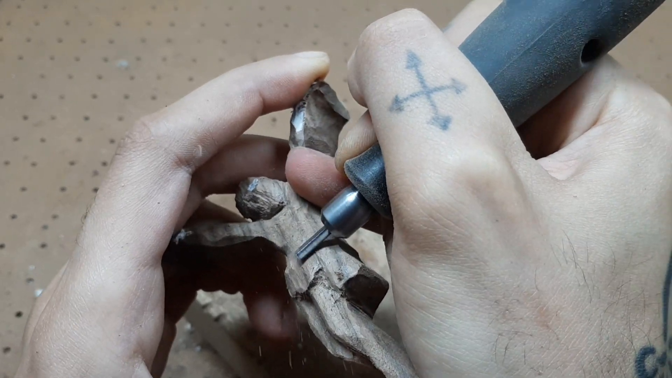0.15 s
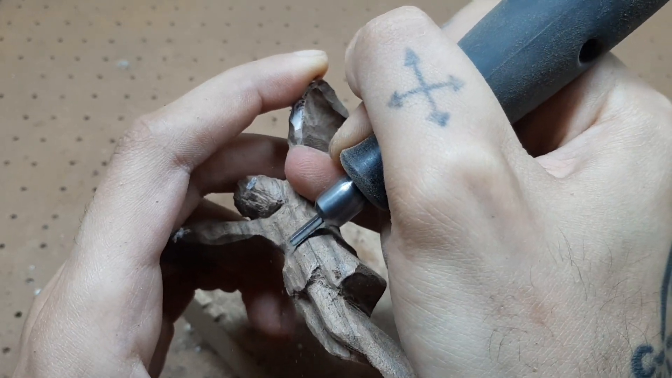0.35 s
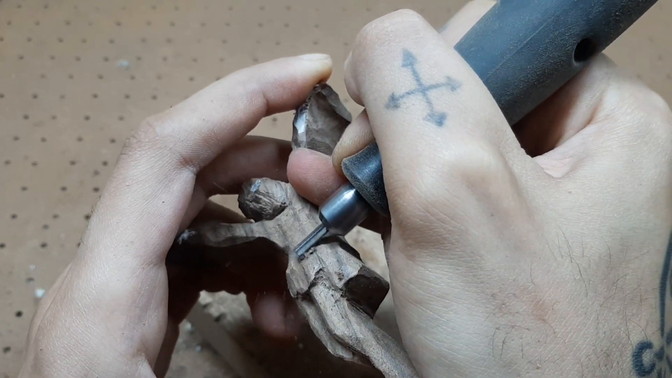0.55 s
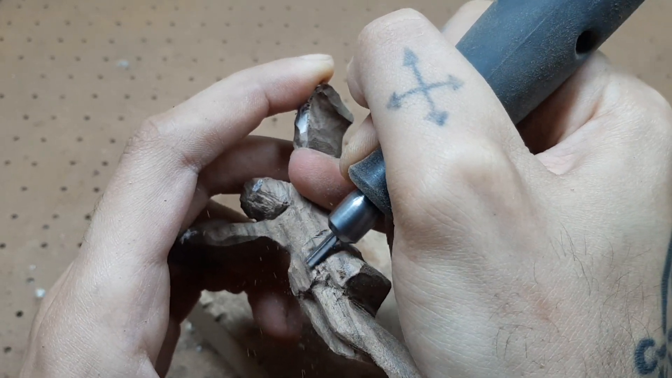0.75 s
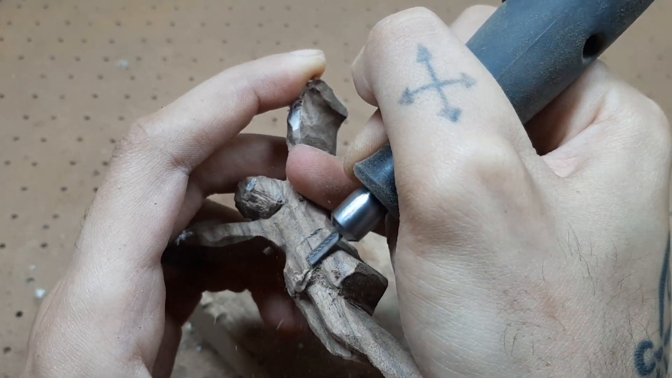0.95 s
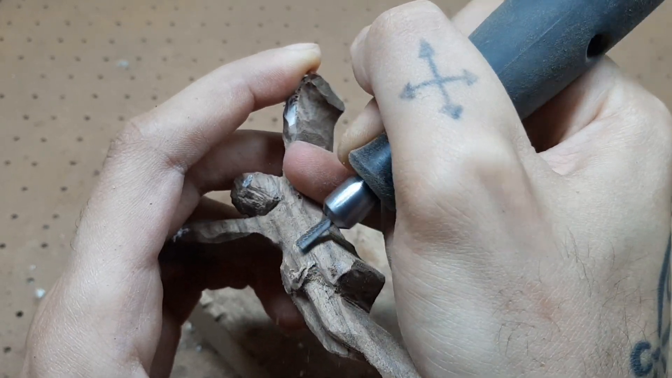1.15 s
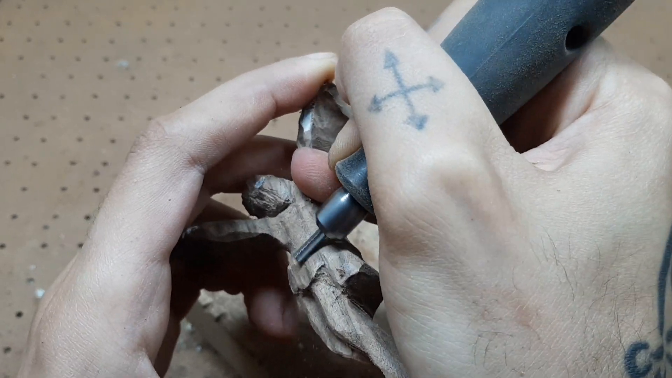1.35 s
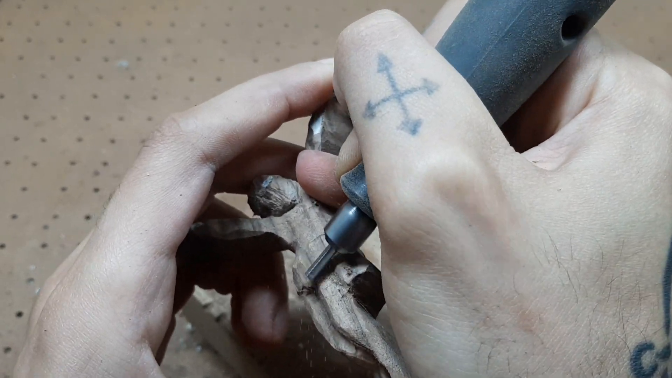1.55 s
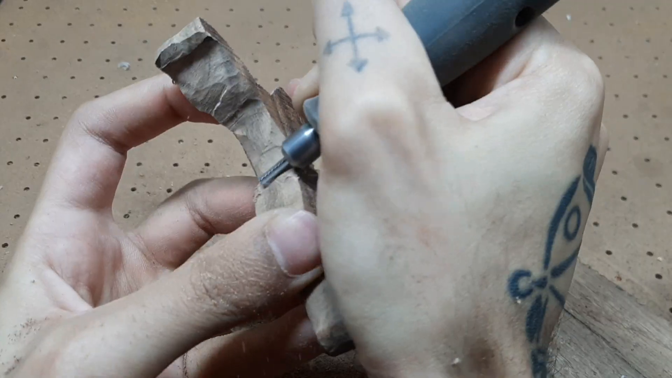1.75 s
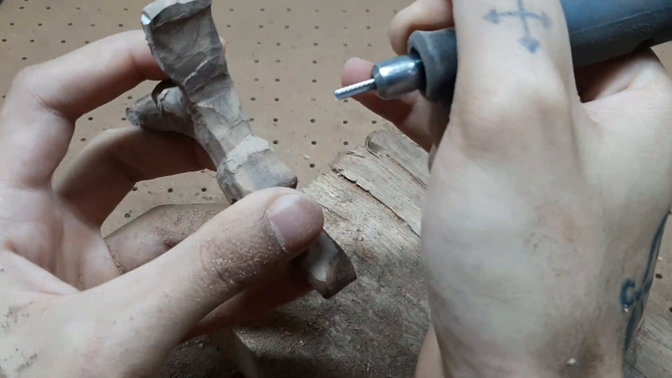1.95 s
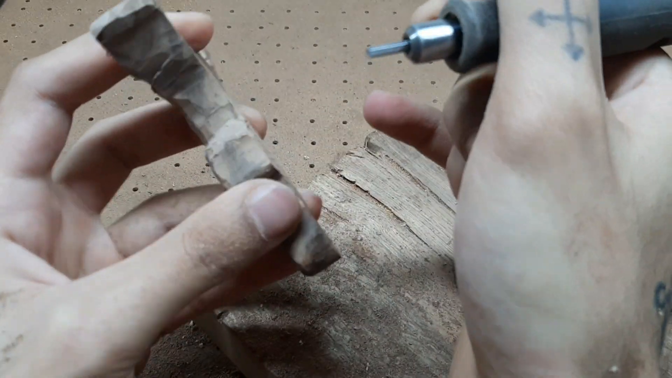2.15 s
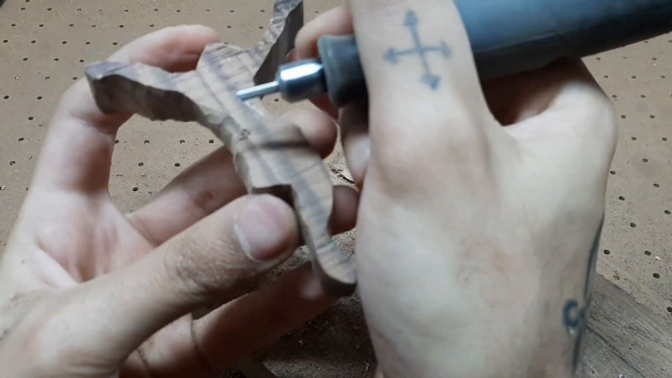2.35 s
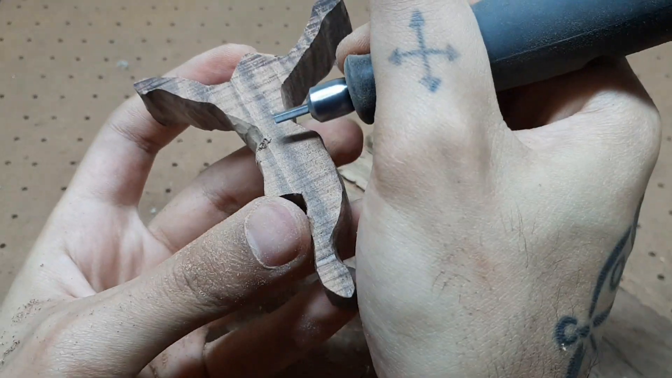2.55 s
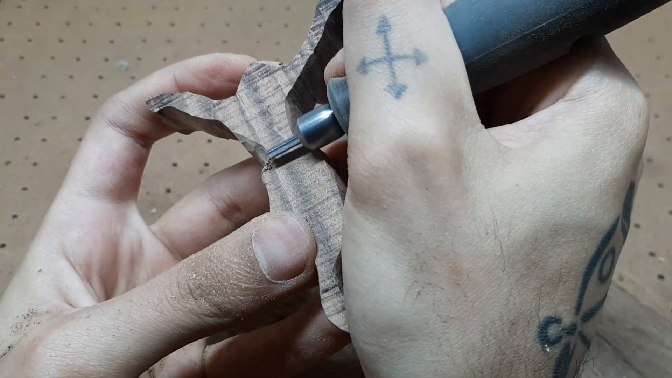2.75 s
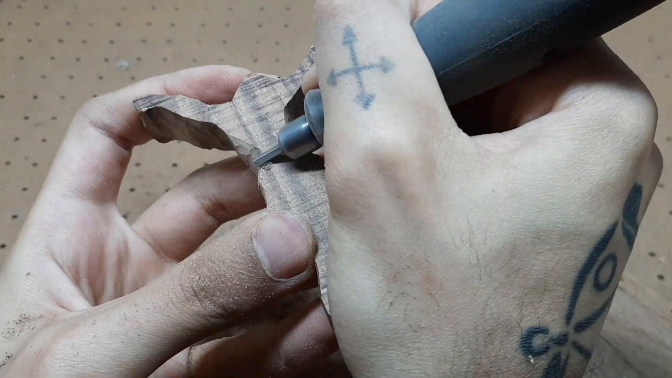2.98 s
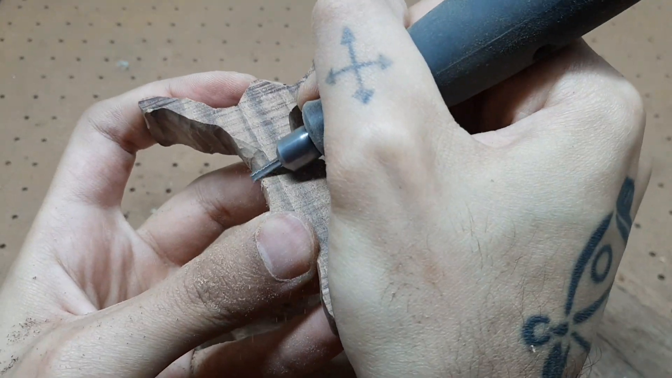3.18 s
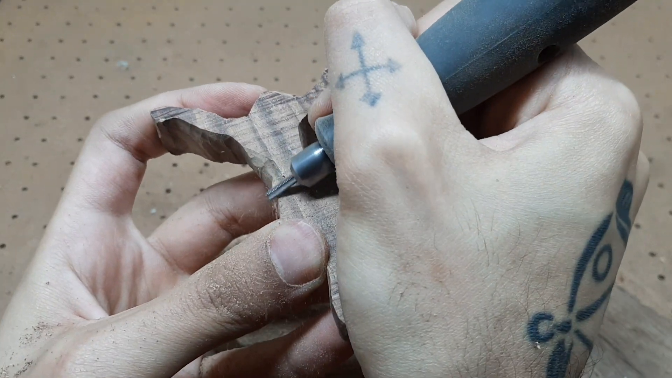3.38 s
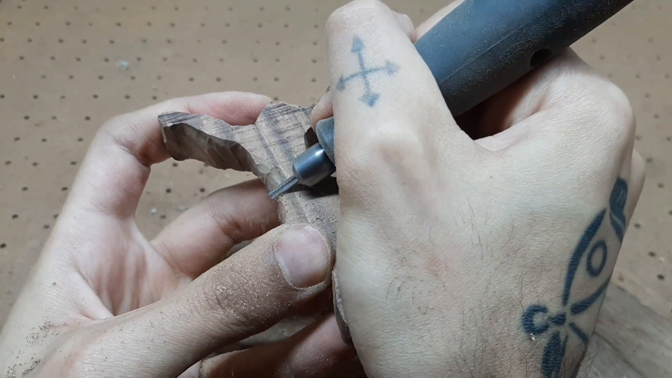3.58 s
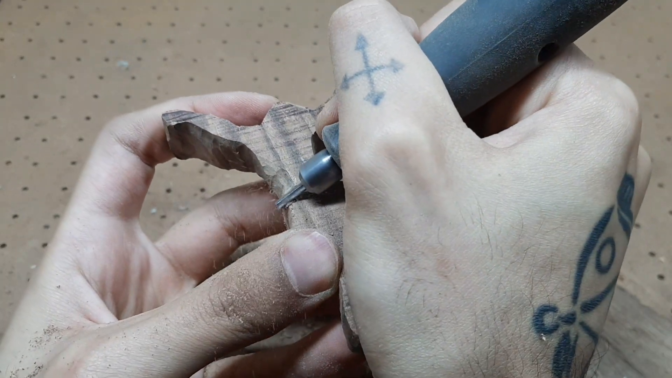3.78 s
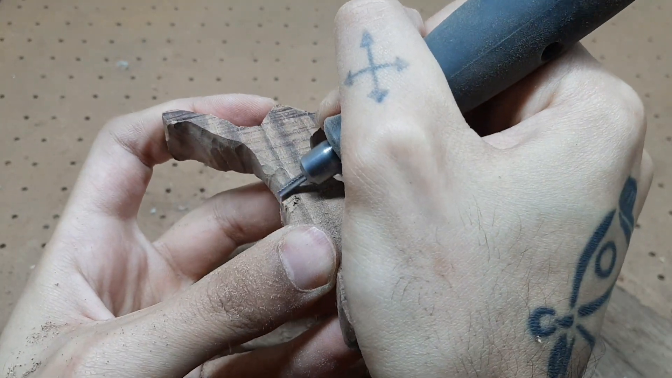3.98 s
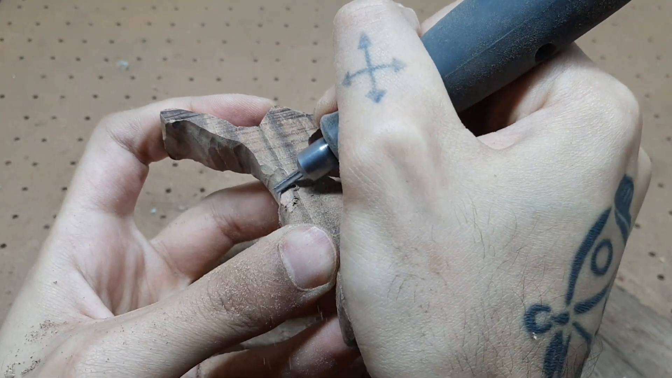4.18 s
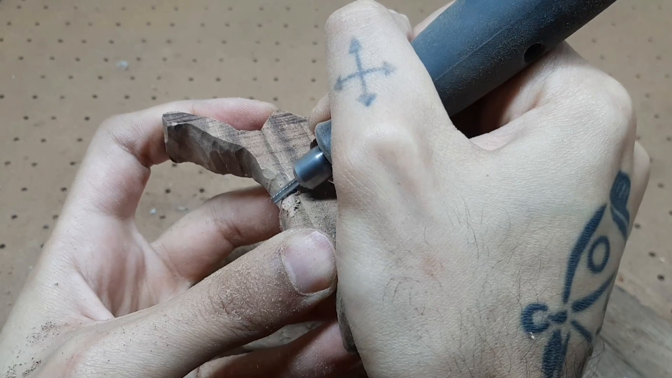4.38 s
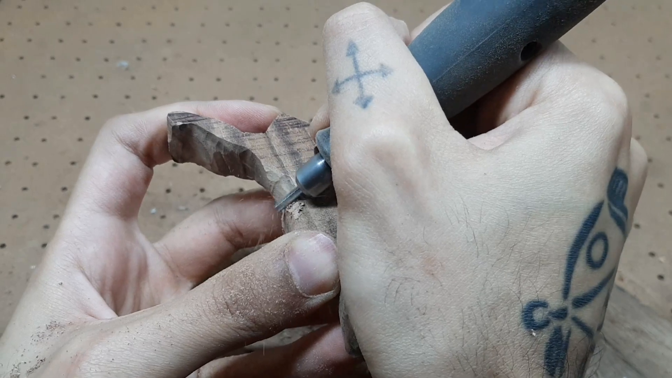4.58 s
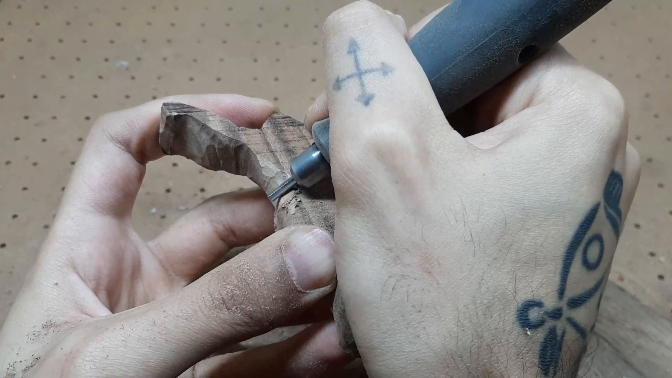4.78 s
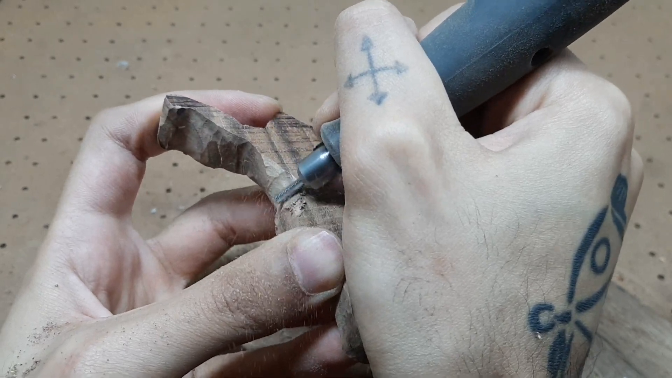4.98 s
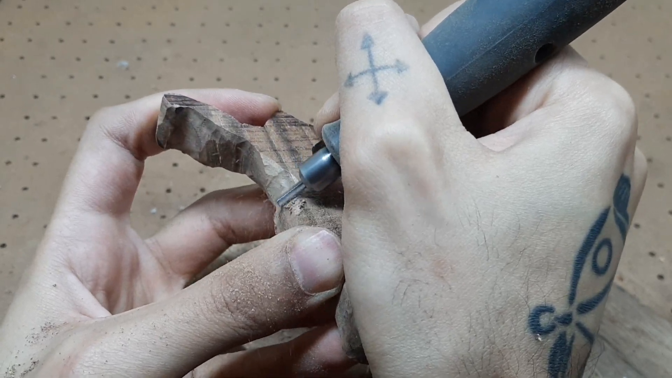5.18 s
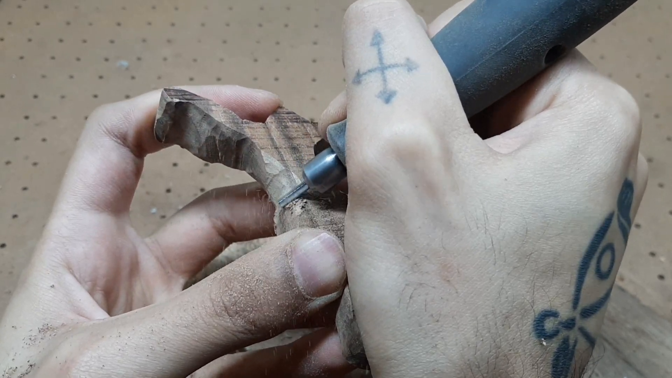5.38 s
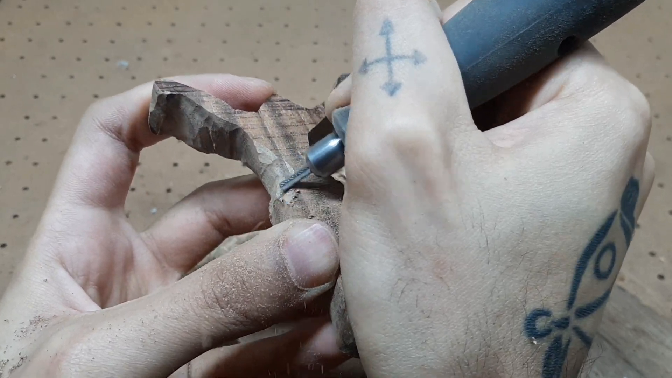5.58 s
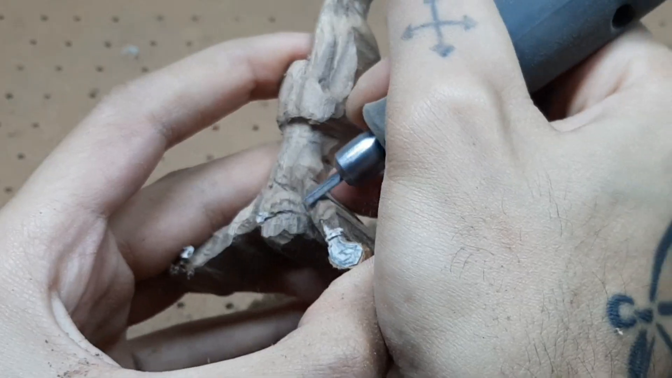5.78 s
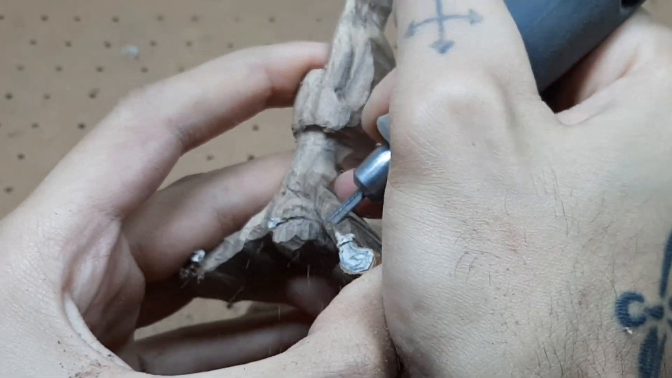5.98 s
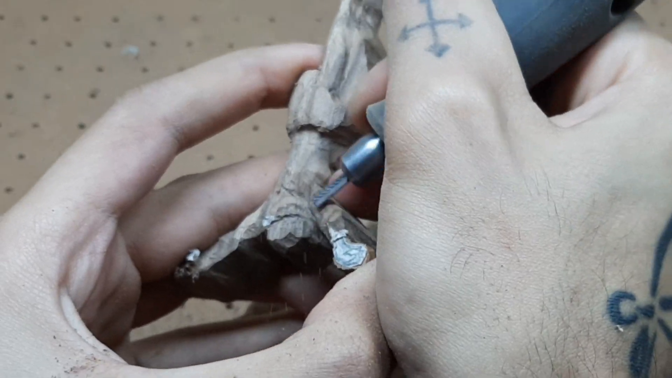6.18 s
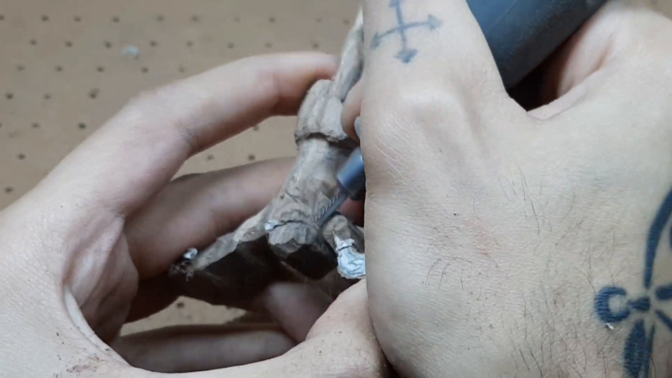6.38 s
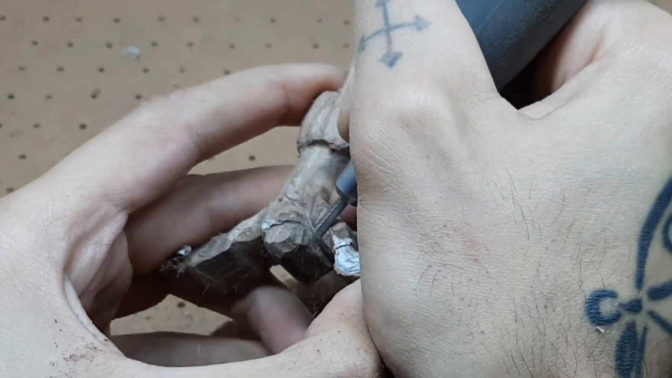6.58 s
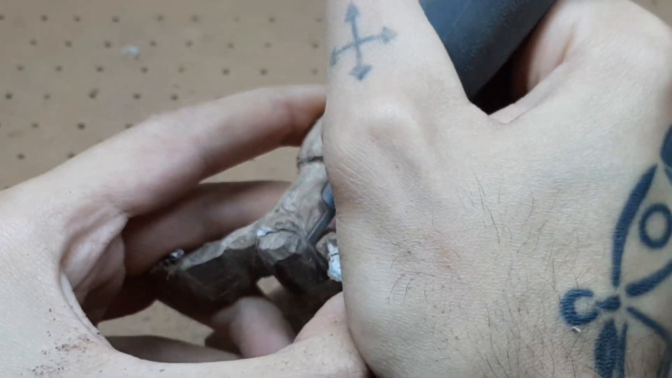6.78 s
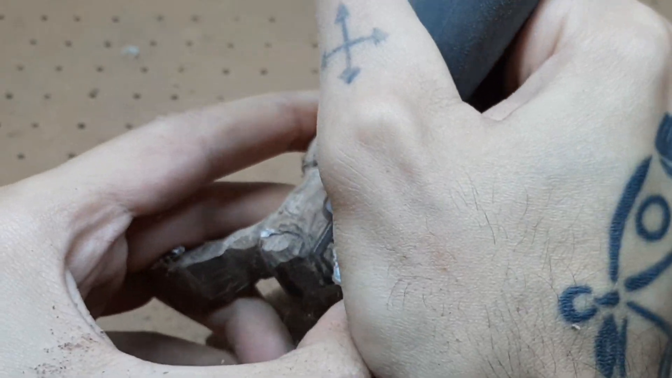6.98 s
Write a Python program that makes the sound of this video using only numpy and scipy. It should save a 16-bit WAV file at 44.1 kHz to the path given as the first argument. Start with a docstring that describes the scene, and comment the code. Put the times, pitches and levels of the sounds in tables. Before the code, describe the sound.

Close-up wood carving with a high-pitched rotary tool: steady airy whir, quick gritty strokes, a short pause with soft thuds, then harsher buzzing bites.

```python
"""A small rotary tool carves a hardwood figure held in the hand, close to a stereo microphone in a workshop.
Its motor rushes and whines through the housing all along, as filtered noise and narrow shaken tones.
Quick strokes open: noise and chip impulses shaped by resonances of wood and bit, with chatter in hard cuts.
In a pause near 2 s the hands knock softly on the bench, as noise bursts that excite decaying modes.
The wood rings differently in a second grip from 2.3 s, where snags bite hard, and in a third from 5.75 s."""
import sys
import numpy as np
from scipy import signal
from scipy.fft import rfft, irfft, next_fast_len
from scipy.io import wavfile

SR = 44100
rng = np.random.default_rng(int(sys.argv[2]) if len(sys.argv) > 2 else 0)


def unload_audio(sound):
    """Save the sound as a 16-bit wav file, at the path given as the first command line argument."""
    columns = np.transpose(np.atleast_2d(sound))
    # keep every value between -1 and 1, then stretch to whole-number steps
    steps = np.round(np.clip(columns, -1, 1) * 32767)
    wavfile.write(sys.argv[1], SR, steps.astype(np.int16))


N = 310464
TIME = np.arange(N) / SR  # s

# strokes of the cutter: middle t/s, half length/s, relative level/dB, rasp of the bit over body of the wood/dB
STROKES = [(.056, .03, -34, 0.5), (0.136, 0.041, -37, -8), (0.223, 0.039, -33.5, -1),
           (0.408, .035, -39.5, -8), (0.509, 0.031, -31, -1.5), (0.627, 0.062, -31.5, -1),
           (0.801, 0.076, -31, -5), (1.009, 0.081, -30.5, -6.5), (1.144, .048, -29.5, -5),
           (1.335, 0.046, -32.5, -5.5), (1.478, 0.053, -30, -3), (1.627, 0.051, -30.5, -5),
           (1.736, 0.043, -40, 7), (1.855, .012, -31.5, 3), (2.634, .14, -38, 24), (2.884, .07, -38, -1),
           (2.978, .035, -29.5, -1), (3.09, 0.045, -26, 9), (3.311, 0.06, -35, 1.5), (3.464, .03, -30, 4.5),
           (3.535, 0.031, -38.5, -6), (3.646, 0.067, -33, 3), (3.735, .04, -23.5, 2.5),
           (3.856, .085, -28, 3), (3.975, .045, -36.5, -1), (4.201, 0.063, -36, 3), (4.335, .05, -33, 3),
           (4.525, 0.069, -33, 1), (4.695, 0.066, -25.5, 1.5), (4.912, 0.054, -33, 0.5),
           (5.056, 0.049, -30.5, 1), (5.252, 0.052, -33.5, -1.5), (5.45, 0.073, -28.5, 2.5),
           (5.555, 0.057, -31, 2), (5.677, 0.024, -37, 1), (5.907, 0.047, -32.5, -3.5),
           (6.038, .048, -28.5, -2), (6.188, 0.046, -31, -2.5), (6.328, .04, -29, -1),
           (6.472, 0.046, -31, -2), (6.609, 0.046, -30, -1.5), (6.74, 0.052, -29.5, -2),
           (6.892, 0.042, -31, -3.5), (7.021, .028, -26, 0.5)]
# likeness of the two sides: f/Hz, coherence of the motor, coherence of the wood
LIKENESS = [(100.1, 0.73, 1), (400.7, 0.46, 0.91), (1310, 0.66, 0.65), (3150, 0.046, 0.1833),
            (5230, 0.52, 0.63), (7300, 0.0779, 0.083), (15000, 0.056, 0.18)]
# grinding spectrum in each grip: f/Hz, relative level/dB per Hz
GRIND_FRONT = [(80, -35), (280, -38), (550, -32), (1200, -23), (2200, -16), (3100, -12), (5000, -8),
               (6200, -13), (7200, -21), (10000, -20), (15200, -29)]
GRIND_BACK = [(80, -33), (280, -33), (550, -32.5), (1200, -14.5), (2200, -16.5), (3100, -16.5),
              (5000, -13.5), (6200, -19.5), (7200, -20.5), (10000, -25.5), (15200, -26)]
GRIND_END = [(80, -30.5), (280, -37), (550, -26.5), (1200, -19.5), (2200, -22), (3100, -15), (5000, -11),
             (6200, -9), (7200, -18), (10000, -20.5), (15200, -23.5)]
# resonances of wood and bit in each grip: f/Hz, width/Hz, lift/dB
WOOD_FRONT = [(852, 240, 14.5), (1587, 280, 16), (2046, 450, 15), (3690, 42, 7.5), (4033.6, 170.2, -1),
              (5480, 180, 7.5)]
WOOD_BACK = [(666, 230, 17.3), (1482, 340, 11.4), (1877, 730, 15.6), (2740, 110, 8.2), (4380, 396, 9.5),
             (5890, 720, 15.1)]
WOOD_END = [(650, 134, 5.5), (1020, 32, 4), (1571, 350, 15.8), (1985.6, 440, 14.2), (3600, 500, 4.8),
            (4200, 63, 2.1)]

FIRM_DB = -30  # level of an ordinary firm cut
RASP_HZ = 2800  # the body of the wood sounds below, the rasp of the bit above


def carving():
    """Stick-slip grows with force: heavier strokes chatter more, and a snag chatters most."""
    # snags, where the bit catches in the grain for an instant: t/s, half length/s, relative level/dB
    snag_list = [(.37, .012, -29.8), (.516, 0.015, -30.5), (.641, .014, -28.5), (.777, 0.019, -31.5),
                 (1.397, .012, -33), (2.957, 0.0089, -30), (3.097, 0.015, -21.5), (3.133, 0.0081, -22),
                 (3.29, .012, -26), (3.693, .009, -21), (3.766, .009, -25), (3.833, 0.013, -24),
                 (3.88, .008, -26.5), (3.947, .007, -23), (4.208, .008, -28), (4.338, 0.0099, -30),
                 (4.716, 0.014, -18.5), (5.035, .011, -25), (5.062, .008, -25.5), (5.261, .008, -30.5),
                 (5.427, .011, -19.5), (5.512, 0.011, -22.5), (5.539, .011, -19), (5.92, .013, -32),
                 (6.331, 0.0073, -26.5)]
    chatter_db, chatter_span_db = -26, 3.5  # level where skipping sets in, and how gradually
    cuts = []
    for s, half_s, level_db, rasp_db in STROKES:
        skipping = 1 / (1.5 + np.exp((chatter_db - level_db) / chatter_span_db))
        cuts.append((s, half_s, level_db, rasp_db, skipping))
    for s, half_s, level_db in snag_list:
        snag_rasp_db = grip_at(s)[3]
        cuts.append((s, half_s, level_db, snag_rasp_db, 1))
    out = np.zeros((2, N))
    for s, half_s, level_db, rasp_db, skipping in cuts:
        sound = cut(half_s, level_db, rasp_db, skipping, grip_at(s))
        add(out, sound, s - sound.shape[1] / SR / 2)
    return out


def grip_at(s):
    """Boundary conditions set the modes of a body: find the grip that holds the piece at time s."""
    # from t/s, free main ring f/Hz, ring under a firm cut f/Hz, rasp of a snag/dB, grinding spectrum, resonances
    grip_list = [(0, 1634, 1590, -5, GRIND_FRONT, WOOD_FRONT), (2.3, 1483, 1560, 2, GRIND_BACK, WOOD_BACK),
                 (5.75, 1622, 1640, 0, GRIND_END, WOOD_END)]
    return grip_list[sum(s > later[0] for later in grip_list[1:])]


def cut(half_s, level_db, rasp_db, skipping, grip, bend_s=0.000803):
    """Forced vibration: the force of bite and chips drives wood that rings low and a bit that rasps high."""
    # where the wood sits: f/Hz, left minus right level/dB
    wood_sides = [(100, 1.5), (750, 3), (1500, 5.5), (2050, -0.5), (2900, -2.5), (4250, 3), (5700, -6.5),
                  (7200, 4), (8500, 18), (10800, 7.5), (15000, 4)]
    ring_scatter = .012  # each spot on the piece rings a little differently
    ring_sag_hz_per_db = 3.5  # pressing harder loads the wood and lowers its ring
    chatter_per_swing = .488  # skips of the bit for each swing of the wood
    lock_db, lock_width_hz = 3.5, 87  # wood and bit fall into step and sharpen the ring
    uneven_db, uneven_hz = 0.62, 39.8  # the grain makes the pressure waver
    chatter_share = 0.64  # of the power of the force in a snag

    _, free_hz, firm_hz, _, grind, modes = grip
    ring_hz = firm_hz * (1 + ring_scatter * rng.standard_normal())
    ring_hz = ring_hz - ring_sag_hz_per_db * (level_db - FIRM_DB)
    skip_hz = ring_hz * chatter_per_swing

    size = next_fast_len(int(6 * half_s * SR) + 2048)
    f = np.fft.rfftfreq(size, 1 / SR)
    gain = colour(f, grind, modes, ring_hz / free_hz)  # the fingers load the wood and move its ring
    # the lift stands on the second harmonic of the skips
    gain = gain * undb(lock_db / (1 + (2 * (f - 2 * skip_hz) / lock_width_hz) ** 2))

    # body and rasp are balanced by power
    low = 1 / (1 + (f / RASP_HZ) ** 12)
    body = gain ** 2 * low
    rasp = gain ** 2 * (1 - low)
    power = body / body.mean() + rasp / rasp.mean() * undb(rasp_db) ** 2
    gain = np.sqrt(power / power.mean()) * undb(level_db)
    # bending waves carry the treble faster than the bass, which smears each blow; bend_s is the delay at RASP_HZ
    gain = gain * np.exp(-4j * np.pi * bend_s * np.sqrt(f * RASP_HZ))

    # brief bites grab and release abruptly, long touches swell
    t = (np.arange(size) - size / 2) / SR
    edge = np.interp(half_s, [.012, .04], [3, 2.1])
    pressure = np.exp(-np.abs(t / half_s) ** edge)
    waver = walk(uneven_hz, size)
    pressure = pressure * undb(uneven_db * (waver - waver.mean()))

    share = chatter_share * skipping
    chips = grit(size, flutter_hz=199.9, flutter_db=1.3, chip_rate=900, chip_share=0.19)
    force = np.sqrt(1 - share) * chips
    force[0] += np.sqrt(share) * chatter(pressure, skip_hz)
    return radiate(force * pressure, gain, wood_sides, [(hz, c) for hz, _, c in LIKENESS])


def chatter(pressure, hz, sag=.09):
    """Stick-slip: the bit skips in uneven blows of power 1, whose rate sags as the cut digs in."""
    size = len(pressure)
    dug = np.cumsum(pressure ** 2) / np.sum(pressure ** 2)  # from 0 to 1 through the cut
    unsteady = .036 * walk(70, size) + .034 * walk(700, size)
    strength = undb(1.8 * walk(400, size))
    skips = np.cumsum(hz * (1 - sag * (dug - .5) + unsteady)) / SR
    blows = np.diff(np.floor(skips), prepend=0) * strength  # one blow at each whole skip
    return (blows - blows.mean()) / blows.std()


def grit(size, flutter_hz, flutter_db, chip_rate, chip_share):
    """Shot noise of power 1: dense tiny impacts in flurries, and single larger ones (chip_rate a second)."""
    hits = rng.random(size) < chip_rate / SR
    chips = hits * rng.standard_normal((2, size)) * np.sqrt(SR / chip_rate)
    dense = rng.standard_normal((2, size))
    flurry = undb(flutter_db * walk(flutter_hz, size))
    flurry = flurry / np.sqrt(np.mean(flurry ** 2))
    return (np.sqrt(1 - chip_share) * dense + np.sqrt(chip_share) * chips) * flurry


def motor():
    """Source and filter: noise from fan air and rattling bearings sounds through the resonant housing."""
    # fan and bearing rush: f/Hz, relative level/dB per Hz
    rush = [(60, -28), (250, -37), (550, -25), (900, -15.5), (2400, -9), (2900, -12.5), (3700, -7.5),
            (5000, -9), (6400, -10), (7000, -22), (8600, -24), (11500, -14), (13500, -18.5), (15200, -17)]
    # resonances of the housing: f/Hz, width/Hz, lift/dB
    housing = [(395, 141, 15.5), (1063, 28, 10.5), (1277, 41, 5.5), (1547, 39, 13), (2033, 230, 9.5),
               (3180, 41, 2.5), (4060, 63, 4.5), (5509, 362, -0.5), (7630, 1140, 8), (9554.3, 338, 2.5),
               (11050, 65.3, 4.5)]
    # where the motor sits: f/Hz, left minus right level/dB
    motor_sides = [(100, 3.5), (400, 0), (1200, -1), (2100, -0.5), (4300, -1.5), (5700, -4), (7300, 0),
                   (8600, 19), (10800, 2), (15000, 1)]
    gain = colour(np.fft.rfftfreq(N, 1 / SR), rush, housing)
    gain = gain / np.sqrt(np.mean(gain ** 2))
    force = grit(N, flutter_hz=225, flutter_db=1.8, chip_rate=900, chip_share=0.058)
    return radiate(force, gain, motor_sides, [(hz, c) for hz, c, _ in LIKENESS]) * undb(-1.62)


def whine(pan_db=3):
    """Rotation makes tones: the high whine drifts with the hold and dips in each stroke; the others only shake."""
    # the high whine: t/s, pitch f/Hz ahead of the sag, level against the motor curve/dB
    whine_path = [(0, 4345, -13.5), (.4, 4390, -13), (1.1, 4385, -14), (1.4, 4425, -13), (1.78, 4360, -11),
                  (1.9, 4260, -11), (2.06, 4225, -10), (2.37, 4360, -10), (2.55, 4340, -10),
                  (2.85, 4350, -11), (3.1, 4240, -16), (5.6, 4240, -17), (5.9, 4225, -10.5),
                  (7.04, 4280, -11)]
    # steadier tones of the running tool: f/Hz, level against the motor curve/dB
    steady_tones = [(1215, -19.5), (1495, -20.5), (2065, -15), (9520, -25.5)]
    sag_hz = 65.6  # a firm cut slows the motor
    whine_hz, whine_db = along(whine_path)
    high = tone(whine_hz - sag_hz * load(), width_hz=30, steady=1.3, wobble=.0045)
    high = high * undb(whine_db + np.array([[pan_db], [-pan_db]]) / 2)
    return high + sum(tone(hz) * undb(db) for hz, db in steady_tones)


def load():
    """Torque on the motor from the strokes: 1 in a firm cut, levelling off in harder ones."""
    push = 0
    for s, half_s, db, _ in STROKES:
        push = push + undb(db - FIRM_DB) * np.exp(-((TIME - s) / half_s) ** 2)
    return 2 * push / (1 + push)


def tone(hz, width_hz=36, steady=0.78, wobble=.008):
    """Modulation widens a line: a narrow tone of power 1 on two sides, shaken in pitch and strength."""
    turn = np.exp(2j * np.pi * np.cumsum(hz * (1 + wobble * walk(20.57, N))) / SR)
    shake = walk(width_hz, N) + 1j * walk(width_hz, N)
    sides = (turn * np.array([steady + shake, 1j * steady + shake.conj()])).real
    return sides / sides.std()


def knocks(rise_s=0.0027, pan_db=2.0):
    """Modal excitation: a soft hand lands on the bench and drags a little, stirring its low modes."""
    # soft knocks: t/s, relative peak level/dB, decay of the drag/s
    knock_list = [(1.16, -52.5, 0.043), (2.035, -46.5, 0.0258), (2.09, -49.5, .05), (2.227, -45, 0.051),
                  (2.291, -52, 0.041), (3.714, -59, 0.02196), (3.892, -51, 0.051), (3.94, -59, 0.0149),
                  (5.577, -60.5, 0.0208), (6.209, -57, 0.042)]
    # modes of the bench: f/Hz, time to fall 60 dB/s, relative level/dB
    bench_modes = [(45.09, 0.0938, -7), (88.64, 0.1372, -2.5), (112.6, 0.141, -1.5),
                   (148.76, 0.04104, -0.5), (280.4, 0.074, -9.5)]
    out = np.zeros((2, N))
    t = np.arange(SR // 2) / SR
    bench = np.zeros(len(t))
    for k, (hz, t60, db) in enumerate(bench_modes):
        ring = np.sin(2 * np.pi * hz * t) * np.exp(-np.log(1000) * t / t60)
        bench += undb(db) * ring * (-1) ** k  # neighbouring modes have opposite signs
    for s, db, drag_s in knock_list:
        rub = rng.standard_normal(len(t)) * np.exp(-t / drag_s) * (1 - np.exp(-t / rise_s))
        thud = signal.fftconvolve(rub, bench)
        sides = undb(db + np.array([[pan_db], [-pan_db]]) / 2)
        add(out, thud / np.abs(thud).max() * sides, s)
    return out


def nearby(sound, echo_db=-10.0, decay_s=0.0034, lowest_hz=900):
    """Early reflections: bench, pegboard and hands throw back quick echoes, different at each port."""
    t = np.arange(SR // 25) / SR
    echoes = rng.standard_normal((2, len(t))) * np.exp(-t / decay_s) * (t > decay_s / 2)
    highpass = signal.butter(2, lowest_hz, "high", fs=SR, output="sos")
    echoes = signal.sosfilt(highpass, echoes)
    echoes *= undb(echo_db) / np.linalg.norm(echoes, axis=1, keepdims=True)
    return sound + signal.fftconvolve(sound, echoes, axes=1)[:, :N]


def radiate(force, gain, pan, likeness):
    """Partial coherence: a direct and a diffuse force pass through one colour to the left and right ports."""
    # the hands bend the sound on its way to the two ports: f/Hz, phase by which left leads/rad
    lead_points = [(300, 0.1), (850, 1.22), (1300, -0.17), (1600, -2.17), (1950, -1.83), (2300, -0.27),
                   (3000, 2.5), (3900, -1.36), (4400, 1.74), (5500, 0.85), (6400, 2.5), (7200, -0.736),
                   (15000, -2)]
    size = force.shape[1]
    f = np.fft.rfftfreq(size, 1 / SR)
    direct, diffuse = rfft(force)
    coherence = across(f, likeness)
    direct = direct * np.sqrt((1 + coherence) / 2)
    diffuse = diffuse * np.sqrt((1 - coherence) / 2)
    ratio = undb(across(f, pan))
    lead = np.exp(1j * across(f, lead_points))
    sides = np.array([ratio * (direct + diffuse), (direct - diffuse) / lead])
    return irfft(sides * gain * np.sqrt(2 / (1 + ratio ** 2)), size)


def colour(f, points, modes, shift=1):
    """Resonance lifts a broad spectrum; shift multiplies the frequencies of the body modes, below RASP_HZ."""
    lift = 0
    for hz, width, db in modes:
        centre = hz * (shift if hz < RASP_HZ else 1)
        lift = lift + db / (1 + (2 * (f - centre) / width) ** 2)
    return undb(across(f, points) + lift) * f ** 2 / (f ** 2 + 35 ** 2)  # high-pass near 35 Hz


def walk(rate, size):
    """Low-passed noise: a smooth random wander of spread 1, about rate turns a second."""
    f = np.fft.rfftfreq(size, 1 / SR)
    x = irfft(rfft(rng.standard_normal(size)) * np.exp(-(f / rate) ** 2), size)
    return x / x.std()


def undb(db):
    """Level is logarithmic: decibels to amplitude gain."""
    return 10 ** (np.asarray(db) / 20)


def along(table):
    """Linear interpolation in time: the columns of a table, one value a sample."""
    s, *columns = np.transpose(table)
    return [np.interp(TIME, s, c) for c in columns]


def across(f, points):
    """Logarithmic pitch: points joined by straight lines on a log-frequency axis."""
    hz, value = np.transpose(points)
    return np.interp(np.log(f + 1), np.log(hz), value)


def add(out, sound, s):
    """Superposition: mix a sound in from time s on."""
    start = int(s * SR)
    a, b = max(start, 0), min(start + sound.shape[-1], N)
    if b > a:
        out[:, a:b] += sound[..., a - start:b - start]


def scene():
    """Superposition: tool and cuts with their near echoes, and the knocks without."""
    # the running tool, shaded by the hand as it moves: t/s, relative level/dB
    motor_level = [(0, -36.5), (.4, -36.5), (.55, -34), (1.6, -33.5), (1.85, -38), (2.5, -36), (2.9, -31.5),
                   (3.2, -35.5), (3.6, -36), (4.07, -37.5), (5.3, -36.5), (5.68, -39), (5.8, -42),
                   (5.9, -37.5), (6.3, -36), (7.04, -34.5)]
    motor_db, = along(motor_level)
    tool = (motor() + whine()) * undb(motor_db)
    return nearby(tool + carving() * undb(0.18)) + knocks() * undb(-1.5)


def record(dry):
    """Band limiting: a steep elliptic low-pass cuts the treble above 15.5 kHz."""
    lowpass = signal.ellip(12, .1, 80, 15500, fs=SR, output="sos")  # ripple 0.1 dB, stopband 80 dB down
    return signal.sosfilt(lowpass, dry)


dry = scene()
out = record(dry)
unload_audio(out)
```